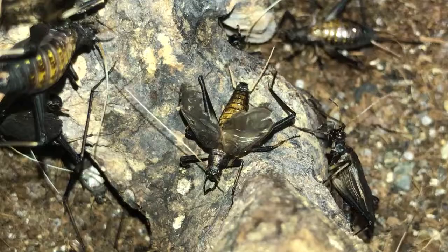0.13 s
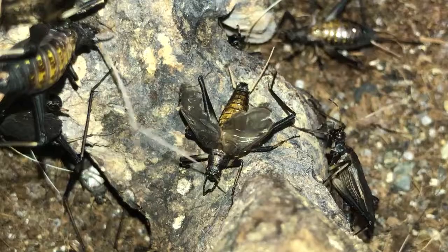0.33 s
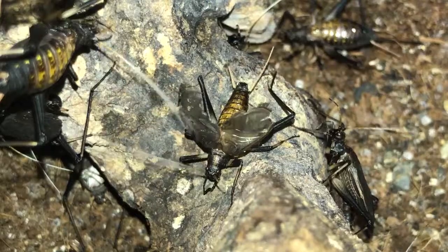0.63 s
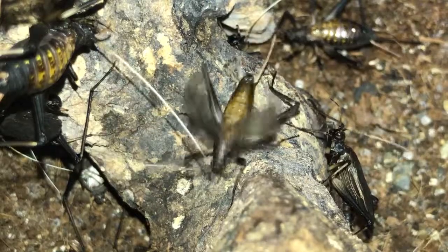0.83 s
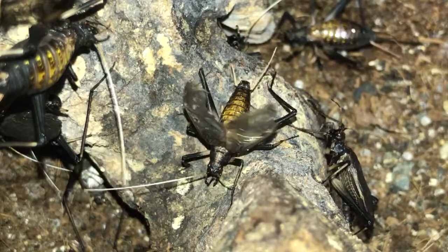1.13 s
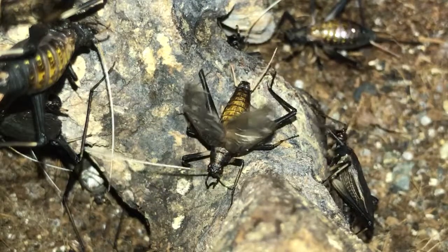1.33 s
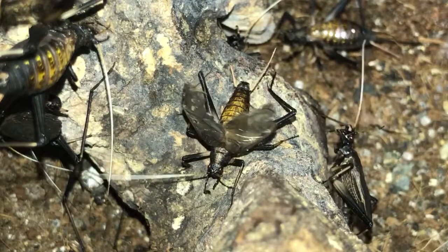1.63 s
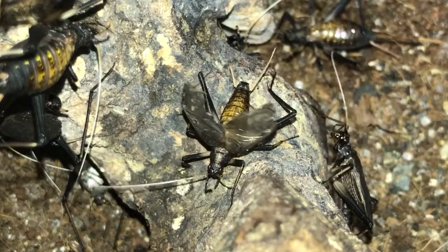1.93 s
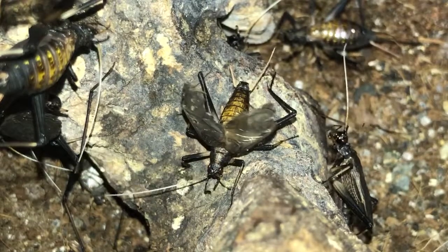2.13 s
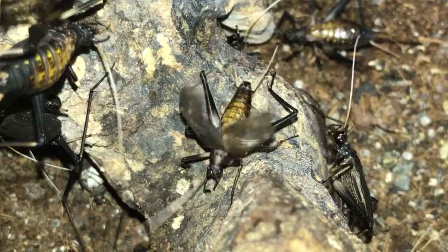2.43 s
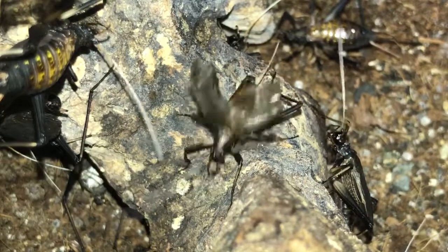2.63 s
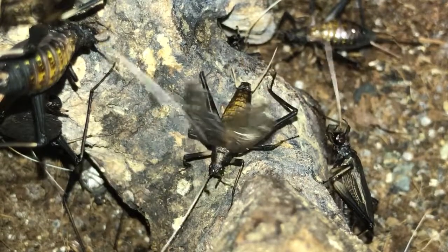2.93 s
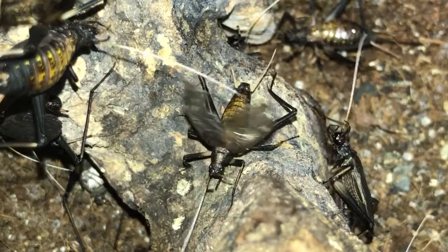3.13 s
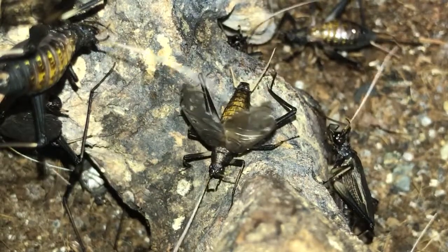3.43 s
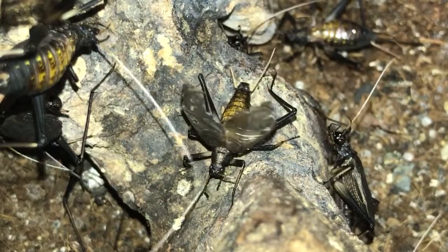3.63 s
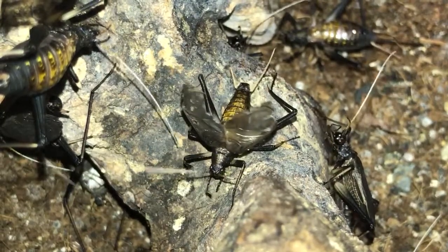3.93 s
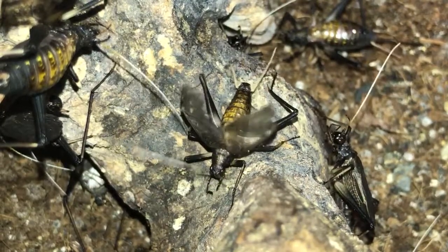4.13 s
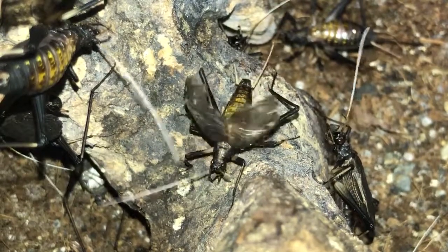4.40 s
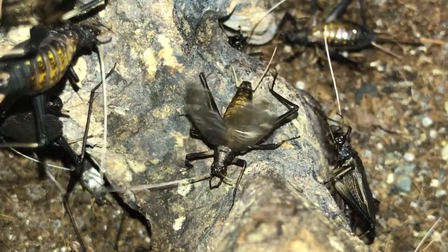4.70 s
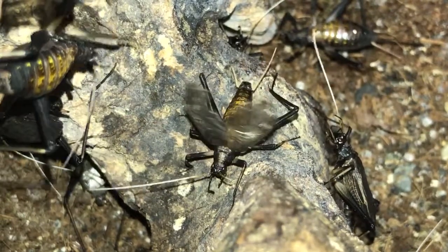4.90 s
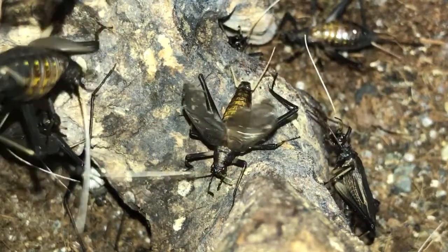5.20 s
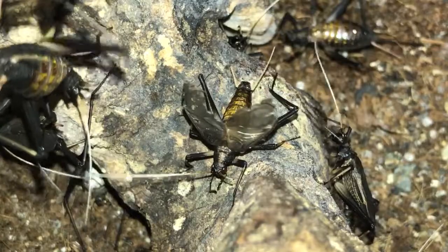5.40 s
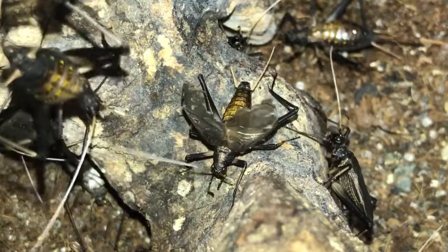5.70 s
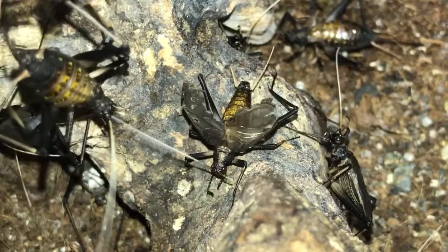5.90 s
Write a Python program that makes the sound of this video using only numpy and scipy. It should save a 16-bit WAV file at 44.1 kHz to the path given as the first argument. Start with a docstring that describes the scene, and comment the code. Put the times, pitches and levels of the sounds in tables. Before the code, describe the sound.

Very close cricket song: light dry ticking, then three bright bell-like trills near 4.8 kilohertz, with soft steady ringing between them over faint room murmur.

```python
"""In a quiet room, right under a microphone, a male bell cricket sings on a piece of bark.
His raised wings scissor about 39 times a second. Light strokes only rasp: bursts of noise ring the wings.
When the scraper catches the file, the wing rings near 4.8 kHz: short, nearly pure tones with a bright rasp.
Three bouts each swell into a loud bell-like trill and sink to a soft chirr.
Behind him are a low murmur, a wavering hum, a few soft bumps and faint hiss."""
import sys
import numpy as np
from scipy import signal
from scipy.fft import rfft, irfft, next_fast_len
from scipy.io import wavfile
from scipy.ndimage import uniform_filter1d

SR = 44100
rng = np.random.default_rng(int(sys.argv[2]) if len(sys.argv) > 2 else 0)


def generate_wav(sig):
    """Save sig (samples, or channels by samples) to the path in sys.argv[1] as 16-bit PCM at SR."""
    pcm = np.round(np.clip(np.atleast_2d(sig).T, -1, 1) * 32767).astype(np.int16)
    wavfile.write(sys.argv[1], SR, pcm)


N = 266981
TIME = np.arange(N) / SR  # seconds
FREQS = np.fft.rfftfreq(next_fast_len(N), 1 / SR)  # Hz


def undb(db):
    """Turn decibels into gain."""
    return 10 ** (np.asarray(db) / 20)


def unit(x):
    """Scale to rms 1."""
    return x / np.sqrt(np.mean(x ** 2))


def walk(rate):
    """Smooth random wandering with spread 1, drawing a new value rate times a second."""
    size = max(int(SR / rate), 2)
    held = np.repeat(rng.standard_normal(N // size + 1), size)
    smooth = uniform_filter1d(uniform_filter1d(held, size), size)
    return unit(smooth[:N])


def chance(count, columns):
    """Bounded chance with spread 1: several values for each of count strokes."""
    return np.sqrt(3) * rng.uniform(-1, 1, (count, columns)).T


def filtered(x, gain):
    """Filter by a gain given at FREQS."""
    size = next_fast_len(N)
    return irfft(rfft(x, size) * gain, size)[:N]


def band(x, hz, width):
    """Keep a soft band around hz, scaled to rms 1."""
    return unit(filtered(x, 1 / (1 + (2 * (FREQS - hz) / width) ** 2) ** 2))


def swells(times, dbs, lengths, edge):
    """Loudness curve of short events, each centred on its time, with flanks edge seconds soft."""
    out = np.zeros(N)
    for s, db, length in zip(times, dbs, lengths):
        reach = length + 10 * edge
        near = slice(*np.searchsorted(TIME, [s - reach, s + reach]))
        out[near] += undb(db) * (1 + np.tanh((length / 2 - abs(TIME[near] - s)) / edge)) / 2
    return out


# colour of the room's murmur, fading into hiss: (frequency_hz, relative_level_db per Hz)
MURMUR = [(15, -44.5), (25, -14.5), (38, -7), (54, -3), (139, -13), (228, -11.5), (307, -14), (493, -24.5),
          (856, -28.5), (1020, -24.5), (1500, -29.5), (2800, -29.5), (6000, -34.5), (15000, -45.5)]
# how strong the hum is, before it wavers: (time_s, level_db)
HUM_LEVEL = [(0, -64), (1.0, -66), (1.7, -72.5), (2.5, -61), (2.9, -61.5), (3.2, -83), (4.5, -81.5),
             (6.0, -92)]
# faint low bumps: (centre_s, level_db, length_s, pitch_hz)
LOW_BUMPS = [(1.516, -66, 0.084, 174.5), (1.724, -64.5, 0.074, 165.2), (4.42, -59.5, 0.072, 86.5),
             (5.007, -65, 0.091, 194.8), (5.108, -61, 0.088, 225)]


def room():
    """Noise shaped into murmur and hiss, plus slightly unsteady low sines for the hum and bumps."""
    murmur_db, hum_hz, waver_db = -65, 51.3, 2
    hz, db = np.transpose(MURMUR)
    colour = undb(np.interp(np.log(FREQS + 1), np.log(hz), db))
    air = unit(filtered(rng.standard_normal(N), colour)) * undb(murmur_db + .5 * walk(3.36))

    hum_db = np.interp(TIME, *np.transpose(HUM_LEVEL)) + waver_db * walk(8)
    hum = undb(hum_db) * np.sin(2 * np.pi * hum_hz * TIME + .6 * walk(15))

    bumps = np.zeros(N)
    for s, level, length, pitch in LOW_BUMPS:
        tone = np.sin(2 * np.pi * pitch * TIME + .5 * walk(34))
        bumps += swells([s], [level], [length], 0.01) * tone
    return air + hum + bumps


def enclosure(x, wet_db=-28, t60=0.074):
    """Close walls and soil give a faint, short ring: noise that dies by 60 dB in t60 seconds."""
    t = TIME[:SR // 4]
    tail = rng.standard_normal(len(t)) * np.exp(-np.log(1000) * t / t60) * (t > .002)
    return x + undb(wet_db) * signal.fftconvolve(x, tail / np.linalg.norm(tail))[:N]


# the nearly steady wing beat, before small timing slips: (closing_s, stroke_number)
WING_BEAT = [(0.1219, 0), (0.9389, 32), (1.7619, 65), (1.784, 66), (2.3866, 90), (2.8472, 108),
             (3.1695, 120), (3.9977, 152), (4.2608, 162), (4.5184, 172), (4.7424, 180), (4.9035, 186),
             (5.2736, 200), (5.4032, 205), (5.8325, 221)]
# bouts of song, each a swell into the trill and then a long soft chirr; levels and pitch are starting points:
# (engage_s, trill_full_s, trill_fade_s, let_go_s, trill_db, chirr_db, scrape_db, chirp_lengthening_s, pitch_hz)
SONG_BOUTS = [(1.2, 1.252, 1.454, 2.575, -23, -38.5, -40.5, 0.171, 4850),
              (2.78, 2.923, 3.34, 4.325, -22.5, -34.5, -40.5, 0.066, 4838),
              (4.43, 4.611, 5.04, 5.85, -23, -32.5, -39, 0.054, 4824)]
# light rubbing outside the bouts, joined by straight lines: (time_s, closing_scrape_db, return_scrape_db)
LIGHT_RUBBING = [(.12, -53, -54.5), (.8, -51.5, -54), (1.0, -50, -46), (1.12, -56.5, -50),
                 (1.165, -42, -53), (1.19, -41, -54), (2.6, -53, -47.5), (4.4, -57, -48)]
ATTACK_S, RELEASE_S, SAG_DB = 0.0786, 0.1333, 3  # the trill swells, sags while it is held, and sinks back
SHORT_CHIRP_S, LONG_CHIRP_S = 0.0038, .0118  # typical, in the chirr and in the full trill
TRILL_SCRAPE_DB, RETURN_DB, TRILL_RETURN_DB = 9.5, -3.5, -2.5  # added to the chirr's scrape level
TIRE_DB_PER_S, BUILD_DB_PER_S = 3.5, 36  # scraping weakens through the chirr, and builds up before a trill
CHIRP_TIRE_DB_PER_S = 1.8  # the soft chirps weaken more slowly
SETTLE_S = .5  # after a trill the strokes smear and sound hollow, less and less over about this long


def song():
    """What the cricket does on each wing stroke: when it closes, how hard it rubs, how well it grips."""
    beat_s, number = np.transpose(WING_BEAT)
    s = np.interp(np.arange(number[-1] + 1), number, beat_s)
    bouts = np.array(SONG_BOUTS)
    bout = np.maximum(np.searchsorted(bouts[:, 0], s) - 1, 0)
    engages, full, fades, lets_go, trill_db, chirr_db, scrape_db, lengthen_s, hz = bouts[bout].T
    engaged = (s > engages) & (s < lets_go)

    rising, falling = 1 + (s - full) / ATTACK_S, 1 - (s - fades) / RELEASE_S
    trill = np.clip(np.minimum(rising, falling), 0, 1)  # 0 chirr, 1 full trill
    sag = SAG_DB * np.clip((s - full) / (fades - full), 0, 1)
    chirr_s = np.maximum(s - fades, 0)
    scrape_db = scrape_db - TIRE_DB_PER_S * chirr_s - BUILD_DB_PER_S * np.maximum(full - s, 0)
    unsettled = engaged * (s > fades) * (1 - trill) * np.exp(-chirr_s / SETTLE_S)
    opening = np.clip((s - full + ATTACK_S / 2) / (lengthen_s + ATTACK_S / 2), 0, 1)  # chirps lengthen

    grip, late = chance(count=len(s), columns=2)
    slop_s, same_stroke_s, worst_grip = .0004, .012, -1.7
    juddering = abs(s[:, None] - np.array(PLAIN_JUDDERS)[:, 0]).min(axis=1) < same_stroke_s
    grip = np.where(s < full, abs(grip) / 2, grip)  # fresh strokes before a trill grip well
    grip = np.where(juddering, worst_grip, grip)  # but juddering ones never do

    light_s, light_closing, light_return = np.transpose(LIGHT_RUBBING)
    firm_closing = scrape_db + trill * (TRILL_SCRAPE_DB - sag)
    firm_return = scrape_db + RETURN_DB + trill * TRILL_RETURN_DB
    return dict(s=s + slop_s * late, engaged=engaged, trill=trill, chirr_s=chirr_s, unsettled=unsettled,
                grip=grip, juddering=juddering, hz=hz,
                chirp_db=chirr_db + trill * (trill_db - sag - chirr_db) - CHIRP_TIRE_DB_PER_S * chirr_s,
                chirp_s=SHORT_CHIRP_S + trill * opening * (LONG_CHIRP_S - SHORT_CHIRP_S),
                closing_db=np.where(engaged, firm_closing, np.interp(s, light_s, light_closing)),
                return_db=np.where(engaged, firm_return, np.interp(s, light_s, light_return)))


# frequencies at which the wings ring: (frequency_hz, width_hz, relative_level_db)
WING_RESONANCES = [(3780, 260, 4), (4280, 390, 7), (4920, 530, 11.5), (5430, 1030, 7.5), (6510, 230, -1),
                   (7030, 550, 4.5), (8350, 610, 8), (8790, 540, 7.5), (9180, 350, 7), (9700, 240, -1),
                   (10490, 1340, 0), (11770, 1100, 2), (13270, 530, 2), (14590, 1160, 3.5),
                   (15630, 620, 3.5)]
# narrow dips between the wing resonances: (frequency_hz, depth_db)
WING_DIPS = [(4000, -9), (6270, -5), (7350, -9), (9960, -5), (11140, -6), (12410, -5), (13670, -5)]


def wings(x, dip_width_hz=70):
    """Ring a force through the wing resonances; so small a plate radiates little bass."""
    between_db, low_hz = -17, 3500
    power = (undb(between_db) * (FREQS + low_hz / 20) / (FREQS + low_hz)) ** 2
    for hz, width, db in WING_RESONANCES:
        power = power + (undb(db) / (1 + (2 * (FREQS - hz) / width) ** 2)) ** 2
    dips = undb(sum(db / (1 + ((FREQS - hz) / dip_width_hz) ** 2) for hz, db in WING_DIPS))
    size = next_fast_len(N)
    cepstrum = irfft(np.log(unit(np.sqrt(power) * dips)), size)
    cepstrum[1:size // 2] *= 2  # causal: the ring follows the blow
    cepstrum[size // 2:] = 0
    return filtered(x, np.exp(rfft(cepstrum)))


def teeth(grain_db):
    """Uneven impacts of the scraper on the file: noise of changing strength, with its peaks held down."""
    return unit(rng.standard_normal(N) * undb(grain_db * np.minimum(walk(1500), 1.3)))


def sliding(contact, slide_db=-7, slide_s=0.0022):
    """The wings slide on for a moment after each contact, so the scrape dies away softly."""
    keep = np.exp(-1 / (slide_s * SR))
    return np.maximum(contact, undb(slide_db) * signal.lfilter([1 - keep], [1, -keep], contact))


# loose touches of the wings, off the beat, before the wings ring: (centre_s, level_db, length_s)
LOOSE_TOUCHES = [(0.607, -45.5, 0.0031), (0.711, -42, 0.0022), (.9155, -42.5, 0.0012), (0.977, -49, 0.0012),
                 (.99, -37.5, 0.0015), (1.014, -40.5, .0014), (1.23, -36.5, 0.0076), (5.888, -45, 0.0063),
                 (5.899, -49.5, .007)]
# moments when the wings lose contact and the rubbing drops out: (centre_s, length_s)
CONTACT_SLIPS = [(0.907, 0.013), (1.788, 0.014), (5.465, .014)]


def rubbing(strokes):
    """Every beat: a closing scrape, a thin swish as the wings part, and a scrape as they swing back."""
    edge, slop_s, scatter_db, light_scatter_db = .0005, .0007, 1.6, 2.5
    s, returning, unsettled = strokes["s"], strokes["return_db"], strokes["unsettled"]
    count = len(s)
    size, stretched, late, back_size, back_stretched, swish_late, swish_size = chance(count, columns=7)

    close_db, hardest_db, firm_db, close_s, stretch = -0.5, -32, -40, .0052, .3
    closing = strokes["closing_db"] + size * np.where(strokes["engaged"], scatter_db, light_scatter_db)
    below_firm_db = np.minimum(closing - firm_db, 0)
    # a light stroke is only a tick
    contact_s = close_s * undb(stretch * below_firm_db + scatter_db * stretched)
    close = swells(s, np.minimum(closing + close_db, hardest_db), contact_s, edge)

    back_db, back_s, back_lag_s = -1, 0.0047, 0.016
    back = swells(s + back_lag_s + slop_s * late, returning + back_db + scatter_db * back_size,
                  back_s * undb(scatter_db * back_stretched), edge)

    swish_db, swish_lag_s, swish_s = -4.5, 0.0097, 0.0026
    swish = swells(s + swish_lag_s + slop_s * swish_late, returning + swish_db + swish_size,
                   np.full(count, swish_s), edge)
    swish = swish * band(teeth(1), hz=11200, width=8000)

    # the wings keep dragging lightly until they close again
    drag_db, drag_s, smear_db, smear_s = -12.5, 0.011, 6, 0.0073
    drag = swells(s - drag_s / 2, returning + drag_db + smear_db * unsettled,
                  np.full(count, drag_s), 2 * edge)
    loose = swells(*np.transpose(LOOSE_TOUCHES), edge)

    # firm strokes that grip badly lean on the lowest resonance and sound hollower
    lean_db = -10
    hollow_db = np.minimum(closing, firm_db) + below_firm_db + lean_db - scatter_db * strokes["grip"]
    lean = swells(s, hollow_db, contact_s + smear_s * unsettled, edge)
    lean = lean * band(teeth(0.9), WING_RESONANCES[0][0], width=720)

    slip_at, slip_s = np.transpose(CONTACT_SLIPS)
    touching = 1 - swells(slip_at, np.zeros(len(CONTACT_SLIPS)), slip_s, edge)
    scrape = (sliding(close + back + loose) + drag) * teeth(grain_db=6.5)
    return touching * (scrape + lean + swish)


# strokes where the scraper judders plainly: (centre_s, level_db before the harmonic gains, skip_rate_hz on average)
PLAIN_JUDDERS = [(1.612, -50, 1840), (1.658, -46.5, 1836), (3.004, -47, 1860), (3.505, -47.5, 1797),
                 (3.635, -50, 1851), (4.6, -51, 1745), (4.871, -52, 1721), (5.062, -43.5, 1704),
                 (5.22, -43.5, 1855), (5.51, -43, 1853)]


def judder(strokes, skip_hz=1840, faint_db=-49, fade_db_per_s=11, length=0.013):
    """The scraper skips where it grips badly: a buzz whose second harmonic is near the lowest resonance."""
    first_db, second_db, poor_grip, wander = -20.0, -7.0, 0, .045
    plain_s, plain_db, plain_hz = np.transpose(PLAIN_JUDDERS)
    # faint skips join the plain ones, strongest just after a trill
    skips = strokes["engaged"] & (strokes["chirr_s"] > 0) & (strokes["grip"] < poor_grip)
    skips = skips & ~strokes["juddering"]
    s = np.r_[plain_s, strokes["s"][skips]]
    db = np.r_[plain_db, faint_db - fade_db_per_s * strokes["chirr_s"][skips]]
    hz = np.r_[plain_hz, np.full(skips.sum(), skip_hz)]
    order = np.argsort(s)
    rate = np.interp(TIME, s[order], hz[order]) * (1 + wander * walk(300))
    phase = 2 * np.pi * np.cumsum(rate) / SR
    buzz = undb(second_db) * np.sin(2 * phase) + undb(first_db) * np.sin(phase)
    return swells(s, db, np.full(len(s), length), length / 6) * buzz


# the scraper catches a second time as a trill breaks out: (second_catch_s, level_db)
SECOND_CATCHES = [(2.9319, -25.5), (2.9606, -18), (4.6344, -16.5)]


def chirps(strokes):
    """One chirp per engaged stroke, even in the trill, hit or miss in the chirr: (s, dB, length s, Hz)."""
    trill_scatter_db, chirr_scatter_db, length_scatter_db = .8, 3.0, 1.4
    trill_scatter_hz, chirr_scatter_hz = 18, 45
    double_gap_s, cut_short_s = .0105, .007
    loose = 1 - strokes["trill"]
    stretched, sharp = chance(count=len(loose), columns=2)
    scatter_db = trill_scatter_db + loose ** 2 * (chirr_scatter_db - trill_scatter_db)
    db = strokes["chirp_db"] + strokes["grip"] * scatter_db
    length = strokes["chirp_s"] * undb(length_scatter_db * stretched)
    hz = strokes["hz"] + sharp * (trill_scatter_hz + loose * (chirr_scatter_hz - trill_scatter_hz))
    rows = np.transpose([strokes["s"], db, length, hz])[strokes["engaged"]]
    for s, level in SECOND_CATCHES:  # the first catch is cut short, the second is brief
        first = abs(rows[:, 0] - (s - double_gap_s)).argmin()
        rows[first, 0], rows[first, 2] = s - double_gap_s, cut_short_s
        rows = np.vstack([rows, (s, level, SHORT_CHIRP_S, rows[first, -1])])
    return rows[np.argsort(rows[:, 0])]


def bell(rows):
    """Tooth strikes lock to the main wing resonance: nearly pure chirps, sharp at both ends, plus a rasp."""
    edge, wander, glide_hz, ends_hz = .001, .004, 30, 110
    s, db, length, hz = rows.T
    envelope = swells(s, db, length, edge)
    nearest = np.searchsorted((s[1:] + s[:-1]) / 2, TIME)
    # -1 as the scraper catches, 1 as it lets go
    progress = np.clip(2 * (TIME - s[nearest]) / length[nearest], -1, 1)
    pitch = hz[nearest] + glide_hz * progress / 2 + ends_hz * (progress ** 2) ** 2
    pitch = pitch * (1 + wander * walk(300))
    fresh_start = rng.random(len(s))[nearest]  # every chirp starts afresh in its cycle
    phase = 2 * np.pi * (np.cumsum(pitch) / SR + fresh_start)

    second_db, third_db, shimmer_db, flutter_db, blur, full_db = -19.5, -14, 2, .7, .2, -24
    overtones = np.zeros(N)
    for k, gain in [(2, second_db), (3, third_db)]:
        overtones += undb(gain + shimmer_db * walk(190)) * np.sin(k * phase + blur * walk(1000))
    drive = np.minimum(envelope / undb(full_db), 1)  # softer strokes have weaker overtones
    tone = envelope * undb(flutter_db * walk(300)) * (np.sin(phase) + drive * overtones)

    rasp_hz, dull_db, rasp_db, slip_db, loose_ends = 6200, -8, -15, 2, 0.96
    bright = undb(dull_db) + FREQS ** 6 / (FREQS ** 6 + rasp_hz ** 6)
    # the lock is loosest at both ends
    slipping = undb(rasp_db + slip_db * walk(200)) * (1 + loose_ends * progress ** 2)
    rasp = envelope * slipping * unit(filtered(teeth(grain_db=6.0), bright))
    return tone, rasp, envelope


def scene(lock_db=-25):
    """The cricket in his enclosure, over the room."""
    strokes = song()
    tone, rasp, ringing = bell(chirps(strokes))
    # a strongly ringing wing steadies the scraper, so it scrapes less
    free = 1 / (1 + (ringing / undb(lock_db)) ** 2)
    cricket = tone + wings(free * rubbing(strokes) + rasp) + judder(strokes)
    return (enclosure(cricket) + room())[None]


def record(dry, start_s=.12, bass_hz=36, top_hz=15900):
    """The microphone opens after a moment, and cuts the deep bass and the top."""
    opened = np.clip((TIME - start_s) * 500, 0, 1)  # a 2 ms fade-in
    thinned = signal.sosfilt(signal.butter(4, bass_hz, "high", fs=SR, output="sos"), dry)
    return signal.sosfilt(signal.ellip(10, .2, 70, top_hz, fs=SR, output="sos"), thinned * opened)


dry = scene()
out = record(dry)
generate_wav(out)
```